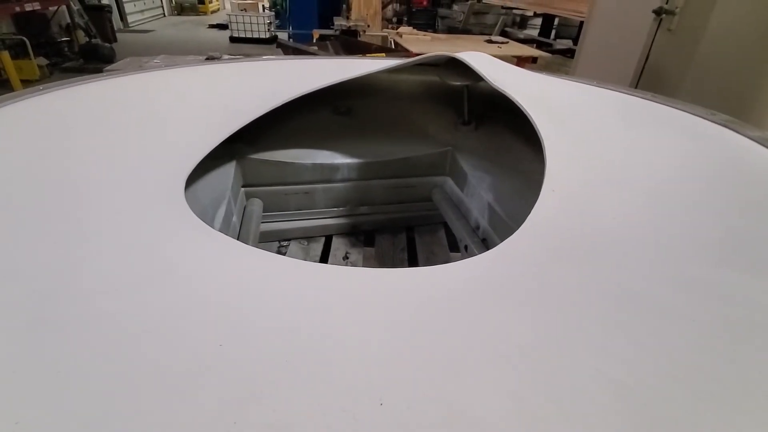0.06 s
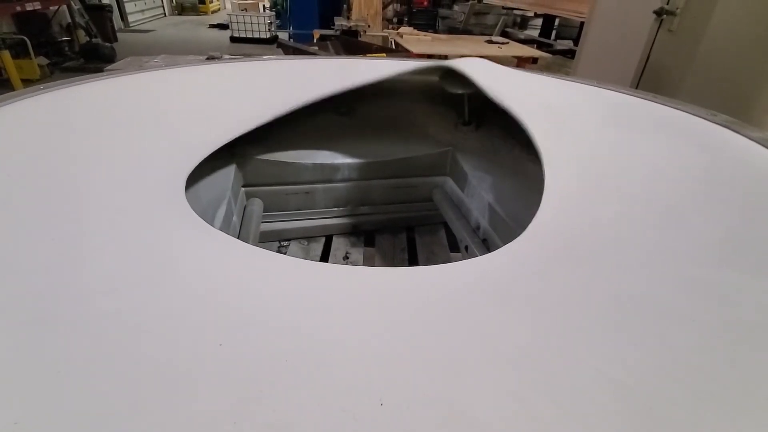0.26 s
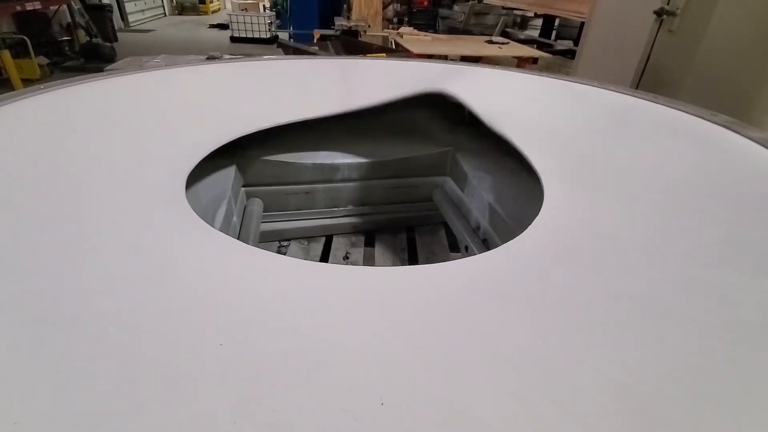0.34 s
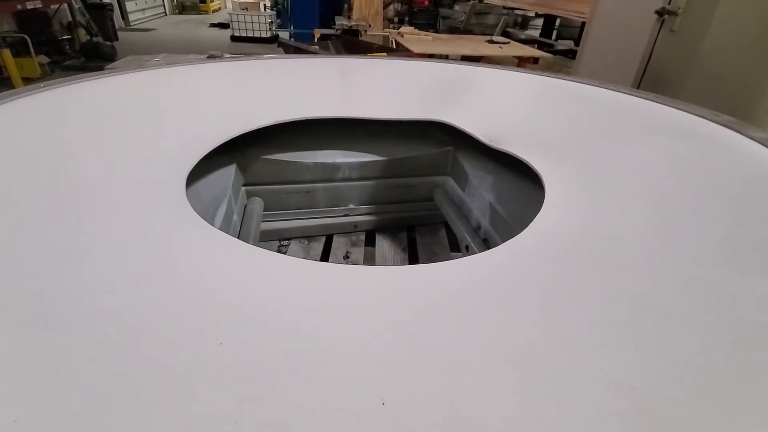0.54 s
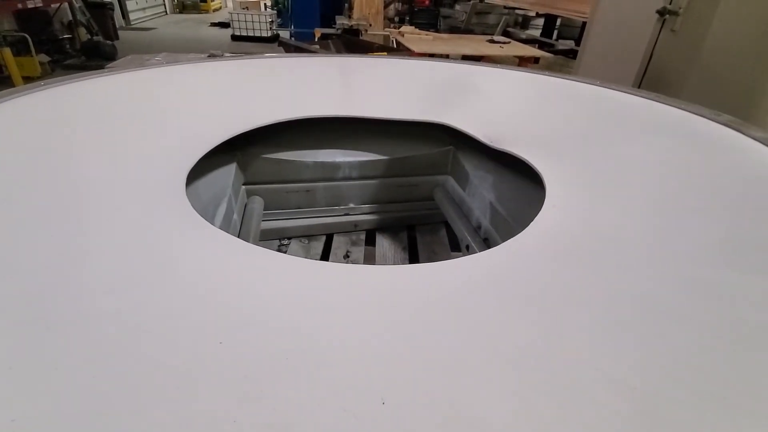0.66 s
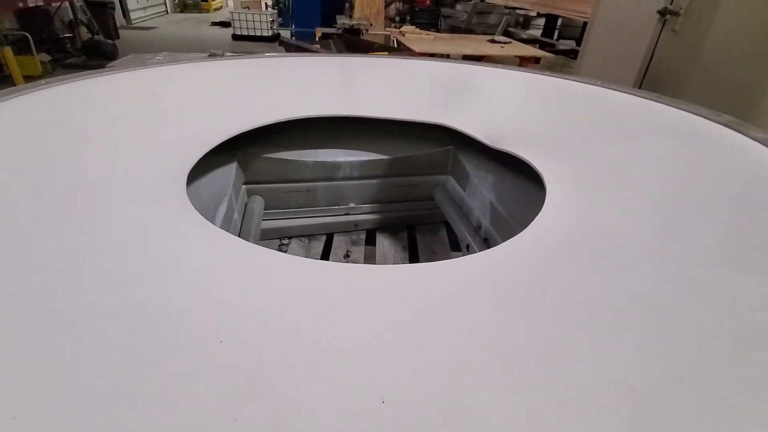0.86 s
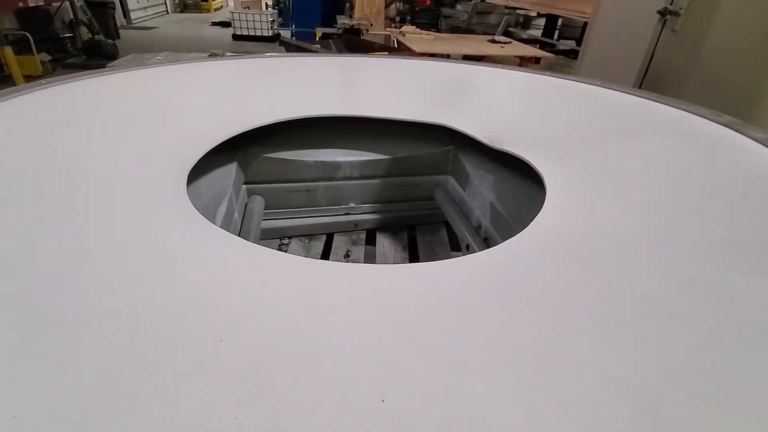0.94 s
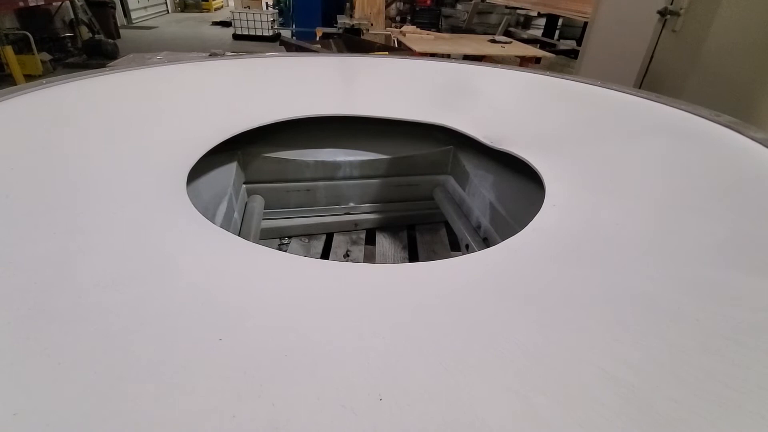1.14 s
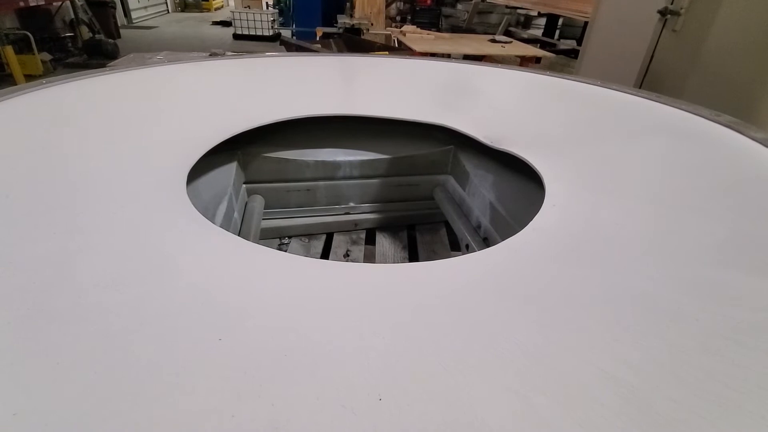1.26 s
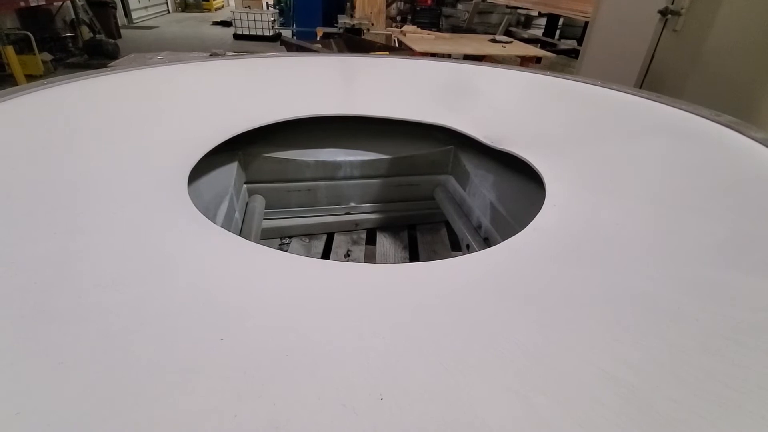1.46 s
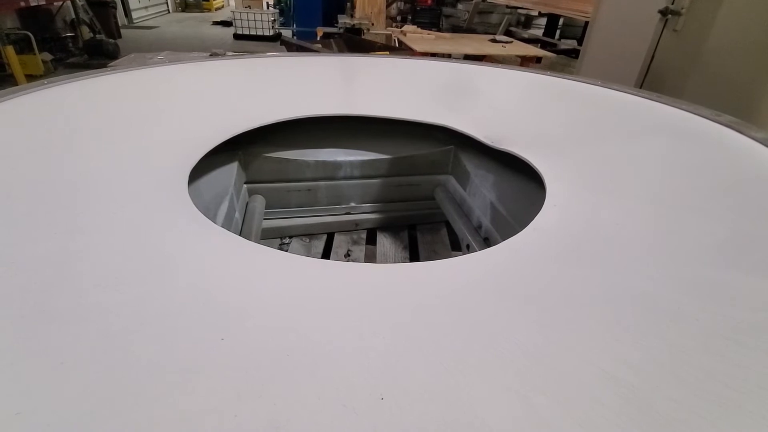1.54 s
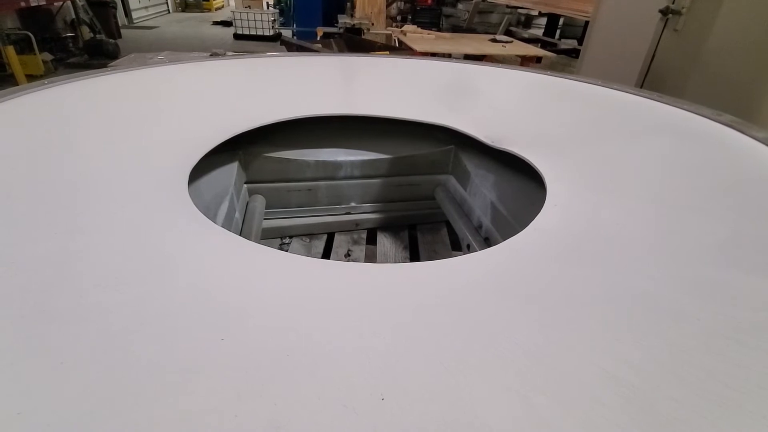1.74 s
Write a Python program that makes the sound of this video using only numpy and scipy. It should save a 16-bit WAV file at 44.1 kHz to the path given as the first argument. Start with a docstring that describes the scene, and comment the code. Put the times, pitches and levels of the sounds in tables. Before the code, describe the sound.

Loud metallic clank of an air-driven tank flap, preceded by a burst of escaping air and slight seal squeaks, followed by brief sheet-metal ringing and fading hiss; close microphone, low workshop hum and moderate hall echo.

```python
"""Air-driven tank flap

An air cylinder drives a flap on a large tank in a humming workshop, built from coloured noise and sines.
Over a low noise rumble, exhaust noise hisses and the seal squeaks in unsteady sines during the stroke.
The flap chatters against its stop: noise bursts, decaying metal and tank modes, and sheet-metal rattle.
The hiss then dies away; a limiter ducks the loudest peaks.
"""
import sys
import numpy as np
from scipy import signal
from scipy.fft import rfft, irfft
from scipy.io import wavfile
from scipy.ndimage import uniform_filter1d, minimum_filter1d

SR = 44100
rng = np.random.default_rng(int(sys.argv[2]) if len(sys.argv) > 2 else 0)


def to_wav(sig):
    """Store sig (one row per channel, or 1-D mono) as 16-bit WAV at the path in sys.argv[1].

    Samples outside -1..1 are clipped; the rate is SR.
    """
    pcm = np.clip(np.atleast_2d(sig), -1, 1) * 32767
    pcm = np.round(pcm).astype(np.int16)
    wavfile.write(sys.argv[1], SR, pcm.T)  # frames by channels


N = 79380  # samples, 1.8 s


def undb(db):
    """Decibels to amplitude gain."""
    return 10 ** (np.asarray(db) / 20)


def clock():
    """Time of every sample, in seconds."""
    return np.arange(N) / SR


def bins():
    """Frequency of every spectrum bin, in Hz."""
    return np.fft.rfftfreq(N, 1 / SR)


def curve(points):
    """Gain envelope, straight in dB between (time [s], level [dB]) points."""
    times, levels = np.array(points).T
    return undb(np.interp(clock(), times, levels))


def on_log(hz, points):
    """Read (frequency [Hz], value) points on a log frequency axis."""
    frequencies, values = np.array(points).T
    return np.interp(np.log(hz + 1), np.log(frequencies), values)


def pan(db):
    """Left and right gains that differ by db; positive leans left."""
    return undb(np.array([[db], [-db]]) / 2)


def walk(rate_hz):
    """Smooth random wander with standard deviation 1; energy falls off above rate_hz."""
    smoothing = 1 + (bins() / rate_hz) ** 2
    wander = irfft(rfft(rng.standard_normal(N)) / smoothing, N)
    return wander / wander.std()


WIDE_HZ = 1019  # left-right correlation of noise has halved here


def noise(colour, peaks=()):
    """Coloured stereo noise of rms 1 with optional resonances, alike in the bass and wide in the treble."""
    hz = bins()
    mid, side = rfft(rng.standard_normal((2, N)))
    alike = 1 / (1 + (hz / WIDE_HZ) ** 2)
    opposite = np.array([[1], [-1]])
    both = mid * np.sqrt(1 + alike) + side * np.sqrt(1 - alike) * opposite
    db = on_log(hz, colour)
    for centre, width, boost in peaks:
        db = db + boost / (1 + (2 * (hz - centre) / width) ** 2)
    x = irfft(both * undb(db), N)
    return x / x.std()


def fade(start, t60):
    """Exponential decay from start, falling 60 dB in t60 seconds; silent before."""
    age = clock() - start
    return (age >= 0) * np.exp(-np.log(1000) * np.maximum(age, 0) / t60)


def rise(start, seconds):
    """Exponential swell from start with this time constant."""
    return 1 - np.exp(-np.maximum(clock() - start, 0) / seconds)


def reflect(x, response):
    """Convolve with a stereo echo response scaled to an average energy of 1 per side."""
    response = response / np.sqrt(np.sum(response ** 2) / 2)
    return signal.fftconvolve(x, response, axes=1)[:, :N]


# Ring time of the hall: (frequency [Hz], t60 [s])
HALL_T60 = [(100, 0.42), (500, 0.93), (1500, 1.11), (3200, 1.08), (6000, 0.73), (10000, 0.5), (16000, 0.29)]


def hall(x):
    """Diffuse echo of the workshop: noise bands, each decaying with its own ring time."""
    hz = bins()
    centres = np.geomspace(60, 16000, 14)
    spectrum = rfft(rng.standard_normal((2, N)))
    tail = 0
    for centre, pick in zip(centres, np.eye(len(centres))):
        band = irfft(spectrum * np.interp(hz, centres, pick), N)
        tail = tail + band * fade(0.011, on_log(centre, HALL_T60))
    return reflect(x, tail)


def nearby(x):
    """Quick reflections off the tank and the machine frame, a short noise scatter as loud as the source."""
    scatter = rng.standard_normal((2, N)) * fade(.001, t60=0.025)
    return (x + reflect(x, scatter)) / np.sqrt(2)


def ring(modes, start, lag_s):
    """Decaying sines of alternating sign; lag_s delays the right side's phase, not its envelope."""
    age = clock() - start - np.array([[0], [lag_s]])
    out = 0
    for k, (hz, db, t60, side) in enumerate(modes):
        tone = np.sin(2 * np.pi * hz * age) * fade(start, t60)
        out = out + (-1) ** k * undb(db) * pan(side) * tone
    return out


def tone(hz, waver_db):
    """Steady machine sine of rms about 1 with wavering level and drifting phase."""
    level = undb(waver_db * walk(4.1))
    drift = .6 * walk(2)  # radians
    return np.sqrt(2) * level * np.sin(2 * np.pi * hz * clock() + drift)


# Background colour of the hall: (frequency [Hz], relative level per hertz [dB])
FLOOR_COLOUR = [(22, -36), (33, -23.5), (48, 3.5), (80, -5), (125, -0.5), (200, -3), (290, -4.5),
                (370, -13.5), (520, -19), (900, -29), (1400, -25.5), (2400, -26), (4500, -31.5),
                (6200, -35.5), (8200, -56), (16000, -56)]
# Level of the background, followed by the machine tones too: (time [s], level [dB])
FLOOR_LEVEL = [(0, -36.5), (.3, -39), (.6, -41.5), (1.1, -43.5), (1.8, -42.5)]
# Machine tones: (frequency [Hz], level relative to the background [dB])
HUM = [(199, -12.5), (226, -14.5), (286, -14.5), (689, -27.5), (1377, -21.5), (1604, -37), (1836, -25),
       (2062, -25.5)]
# Level of the deep hum: (time [s], level [dB])
DRONE_LEVEL = [(0, -44), (.08, -36), (.23, -38.5), (.32, -42), (.6, -55), (1.1, -50), (1.8, -51.5)]
DRONE_HZ = 47.5
HALL_LAG_S = 0.00029  # the ventilation is to the right, so the left microphone hears it later


def workshop():
    """Ventilation noise and a deep hum from a little to the right, with wavering machine tones ahead."""
    hum = sum(undb(db) * tone(hz, waver_db=1.5) for hz, db in HUM)
    drone = curve(DRONE_LEVEL) * tone(DRONE_HZ, waver_db=2.5)
    left, right = noise(FLOOR_COLOUR) * curve(FLOOR_LEVEL) + drone
    delay = np.exp(-2j * np.pi * bins() * HALL_LAG_S)
    late_left = irfft(rfft(left) * delay, N)
    return np.array([late_left, right]) + hum * curve(FLOOR_LEVEL)


# Low rumble of the tank, there from the start and gone after the knock: (time [s], level [dB])
RUMBLE_LEVEL = [(0, -42.5), (.16, -43.5), (.24, -34.5), (.36, -36.5), (.48, -38), (.54, -35), (.6, -100)]
# Colour of the rumble: (frequency [Hz], relative level per hertz [dB])
RUMBLE_COLOUR = [(25, -25), (50, 2), (90, 4), (170, -3), (300, -7.5), (480, -11.5), (750, -18.5),
                 (1200, -35), (3000, -48)]


def rumble():
    """Low noise of the tank, present from the start, swelling during the stroke and gone after the knock."""
    return noise(RUMBLE_COLOUR) * curve(RUMBLE_LEVEL)


# Air flow from the exhaust: (time [s], level [dB])
FLOW = [(.145, -89), (.168, -37), (.19, -30.5), (.23, -23), (.26, -28), (.35, -26.5), (.43, -23),
        (.5, -24.5), (.62, -29.5), (.745, -34), (.8, -58.5), (.9, -80.5)]
# Colour of the exhaust jet: (frequency [Hz], relative level per hertz [dB])
JET_COLOUR = [(300, -7), (1200, -13.5), (2200, -6.5), (3400, 1.5), (4500, -3), (5600, 1.5), (6800, -2),
              (7900, -12.5), (9500, -7), (11800, -0.5), (13500, 0.5), (16000, -3.5)]
# Resonances of the exhaust port, dips negative: (frequency [Hz], width [Hz], boost [dB])
PORT = [(3020, 80, 2), (3080, 32, -3.5), (3400, 37.6, -0.5), (5560, 120, -1), (5540, 190, 6),
        (11210, 160, 3), (12150, 160, 3)]
JET_ROOM_DB, JET_PAN_DB, JET_FLUTTER_DB = -3, -1.5, 1.34  # flutter is a standard deviation


def exhaust():
    """The turbulent jet of spent air: fluttering noise coloured by the port, with its echoes."""
    flutter = undb(JET_FLUTTER_DB * walk(30))
    jet = nearby(noise(JET_COLOUR, PORT) * curve(FLOW) * flutter)
    return (jet + undb(JET_ROOM_DB) * hall(jet)) * pan(JET_PAN_DB)


# Seal squeaks: (start [s], length [s], pitch [Hz], level [dB], pitch jitter [share of pitch])
SQUEAKS = [(.22, .11, 1674, -37, 0.0028), (0.261, 0.066, 1680, -37.5, 0.0032),
           (0.343, 0.077, 1694, -41, .003), (.4, 0.063, 1674, -44, 0.0025),
           (0.309, 0.057, 442, -31.5, .045)]
SQUEAK_ROOM_DB = -9


def squeaks():
    """The seal squeaks during the stroke: short swelling sines of unsteady pitch, with hall echo."""
    dry_squeaks = 0
    for start, length, hz, db, jitter in SQUEAKS:
        swell = np.sin(np.pi * np.clip((clock() - start) / length, 0, 1))
        pitch = hz * (1 + jitter * walk(102))
        phase = 2 * np.pi * np.cumsum(pitch) / SR
        dry_squeaks = dry_squeaks + undb(db) * np.sqrt(2) * swell * np.sin(phase)
    return dry_squeaks + undb(SQUEAK_ROOM_DB) * hall(dry_squeaks[None])


# Tank modes: (frequency [Hz], level [dB], t60 [s], left-right difference [dB])
TANK_MODES = [(116.5, -34.5, 1.27, 0), (164.8, -10, 0.11, 6), (227, -18.5, 0.23, -2),
              (272.3, -26, 0.73, -2.5), (305.6, -20, 0.58, 11), (388, -18, 0.81, -5),
              (446.2, -3.5, .24, 1.5), (585.2, -21.5, 0.44, 0), (600.6, -13.5, 0.19, 17), (739, 4, .15, -2),
              (864, -18, 0.35, 5), (938, -16.5, 0.29, -7), (1028, -20, .45, 3), (1133, -16, 0.15, -4),
              (1349, -26, .55, 10.5)]
STOP_S = .508  # when the flap reaches its stop
TANK_RISE_S, TANK_DB = 0.01, 0.5  # the gain is added to every mode level


def tank_ring():
    """The knock sets the tank's modes ringing; they swell briefly, then decay."""
    modes = ring(TANK_MODES, STOP_S, lag_s=-0.00016)
    return modes * undb(TANK_DB) * rise(STOP_S, TANK_RISE_S)


# Dense rattle of the tank's sheet metal: (frequency [Hz], relative level per hertz [dB])
RATTLE_COLOUR = [(70, -25), (200, 1.5), (330, -8), (520, -14), (750, -8), (1050, 2), (1650, -15),
                 (2100, -4.5), (3200, -18), (4500, -18.5), (9000, -59)]
RATTLE_DB, RATTLE_T60_S, RATTLE_RISE_S = -11.5, 0.26, 0.0053


def rattle():
    """The tank's panels rattle: many dense resonances heard as one decaying noise."""
    envelope = fade(STOP_S, RATTLE_T60_S) * rise(STOP_S, RATTLE_RISE_S)
    return noise(RATTLE_COLOUR) * undb(RATTLE_DB) * envelope


# Higher metallic modes of the stop and the tank:
# (frequency [Hz], level [dB], t60 [s], left-right difference [dB])
METAL_MODES = [(1185, -28, 0.27, -4), (1259, -18.5, 0.18, 5.5), (1451, -22.5, .25, 2.5),
               (2007, -20.5, 0.14, -5), (2227, -22.5, 0.25, -4), (3000, -26.5, 0.59, -12),
               (3149, -12.5, 0.16, -5), (3297, -13.5, 0.047, -10), (3450, -22, 0.4, -6),
               (3750, -37, 0.34, -11), (5244, -8, 0.077, -9), (5472, -23, 0.048, -12),
               (6060, -18, 0.14, -4)]
METAL_AT_S, METAL_DB = .5095, -1  # the gain is added to every mode level


def metal_ring():
    """The struck metal of the stop and the tank rings in higher, decaying modes."""
    return ring(METAL_MODES, METAL_AT_S, lag_s=.00022) * undb(METAL_DB)


# Contacts of the chattering flap: (time [s], level [dB])
CONTACTS = [(0.5102, -3.5), (0.5129, -7.5), (.517, -4.5), (0.5383, -9)]
# Colour of one contact: (frequency [Hz], relative level per hertz [dB])
CLACK_COLOUR = [(40, -38.5), (85, -13), (140, 4.5), (300, -2.5), (700, 2), (1200, -7), (1700, -17.5),
                (2200, -10), (3300, -6.5), (4400, -9.5), (5500, -4.5), (7500, -22.5), (15000, -56)]
CLACK_DB, CLACK_T60_S, CLACK_PAN_DB = -4, 0.045, -3  # the gain is added to every contact level


def clack():
    """Each contact of the flap with its stop is a short decaying burst of noise."""
    bursts = sum(undb(db) * fade(at, CLACK_T60_S) for at, db in CONTACTS)
    return noise(CLACK_COLOUR) * undb(CLACK_DB) * bursts * pan(CLACK_PAN_DB)


KNOCK_ROOM_DB = -14


def knock():
    """The flap chatters on its stop, the tank rings and rattles; contacts and metal modes echo in the hall."""
    strike = clack() + metal_ring()
    return tank_ring() + rattle() + strike + undb(KNOCK_ROOM_DB) * hall(strike)


def scene():
    """Everything at the microphones."""
    return workshop() + rumble() + exhaust() + squeaks() + knock()


LIMIT, RELEASE_DB_PER_S, GAIN_SMOOTHING_S = 0.9, 81, 0.0018
TOP_HZ = 15900


def record(dry):
    """A limiter eases the gain down just ahead of a peak and lets it climb back; the top is cut."""
    peak = np.abs(dry).max(axis=0)
    over_db = 20 * np.log10(np.maximum(peak / LIMIT, 1))
    climb = RELEASE_DB_PER_S * clock()
    duck_db = np.maximum.accumulate(over_db + climb) - climb
    size = int(GAIN_SMOOTHING_S * SR) + 1
    # hold the lowest gain around each sample, then smooth it
    gain = uniform_filter1d(minimum_filter1d(undb(-duck_db), 2 * size), size)
    top_cut = signal.ellip(10, .2, 80, TOP_HZ, fs=SR, output="sos")
    return signal.sosfilt(top_cut, dry * gain)


dry = scene()
out = record(dry)
to_wav(out)
```